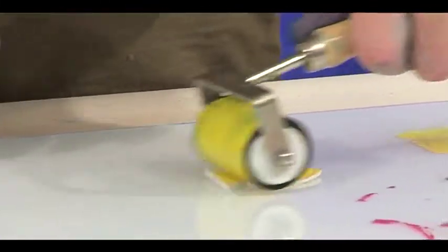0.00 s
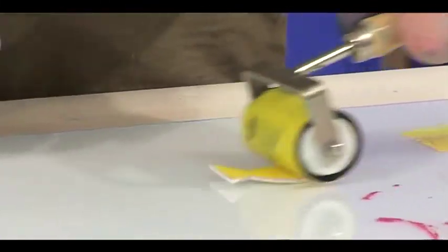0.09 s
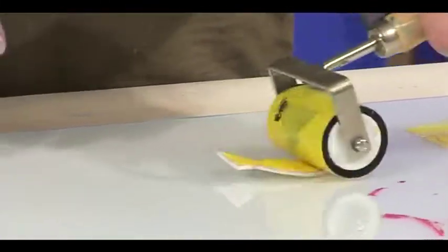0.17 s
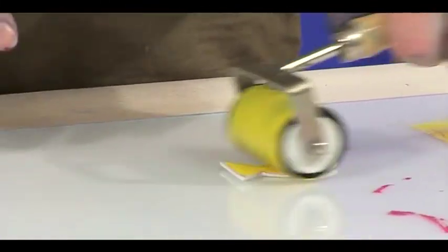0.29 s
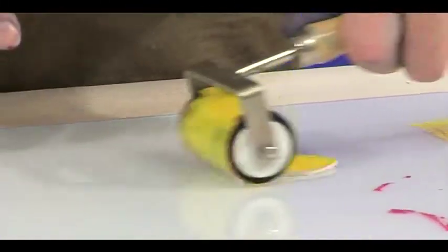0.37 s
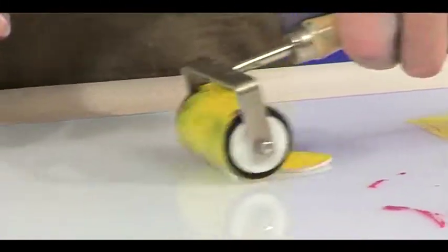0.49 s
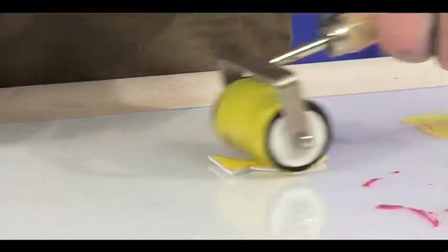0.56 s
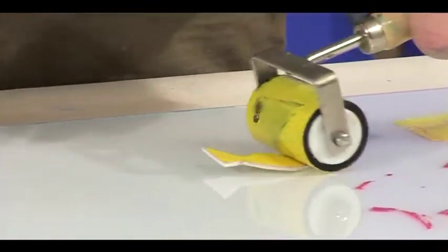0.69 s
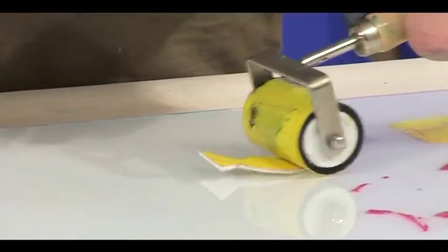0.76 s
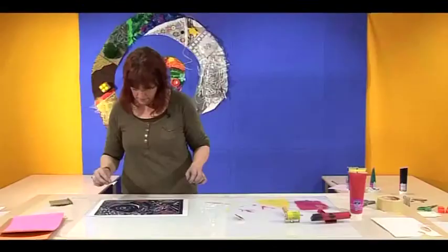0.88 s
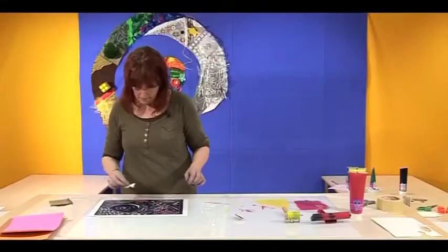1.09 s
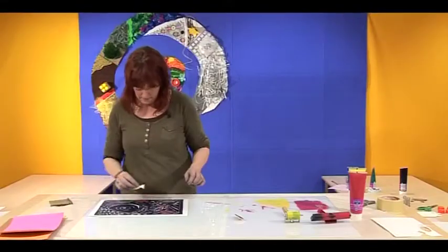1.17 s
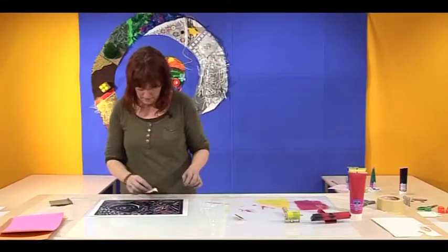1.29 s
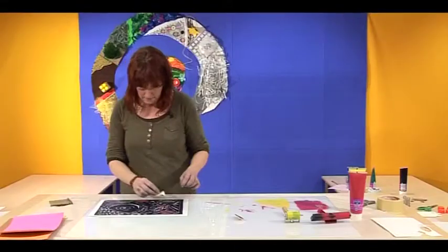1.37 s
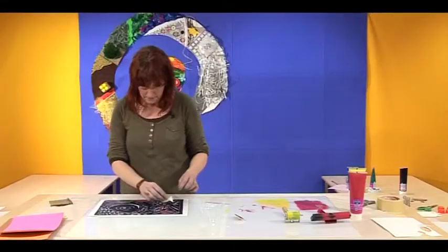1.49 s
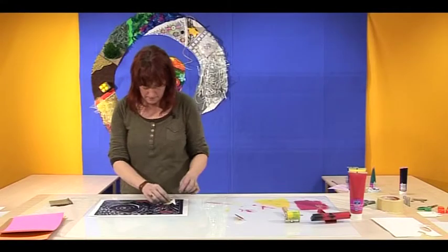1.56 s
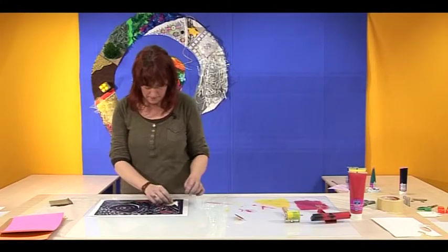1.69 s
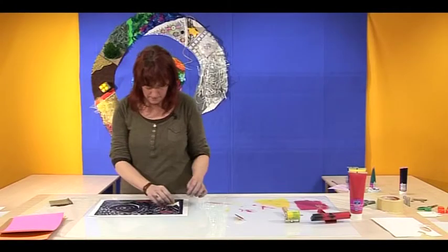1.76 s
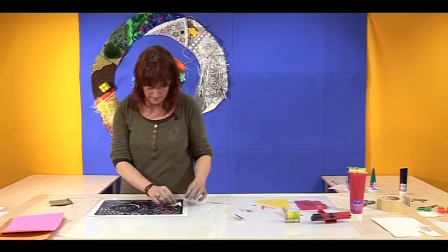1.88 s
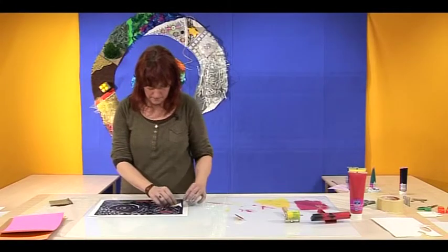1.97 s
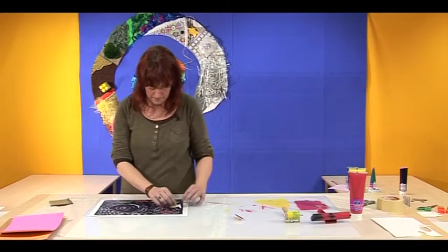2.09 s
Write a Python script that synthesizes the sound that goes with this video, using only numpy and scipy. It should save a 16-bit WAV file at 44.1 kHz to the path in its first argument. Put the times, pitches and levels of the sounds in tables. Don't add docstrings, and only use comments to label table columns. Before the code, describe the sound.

Close-up in a bare, echoing studio, a hand roller chirps and squeaks over faint tacky hiss, with a soft thud between strokes; halfway the sound cuts to a quiet ventilation rumble and light handling noises.

```python
import sys
import numpy as np
from scipy import signal
from scipy.fft import rfft, irfft
from scipy.io import wavfile
from scipy.ndimage import uniform_filter1d

SR = 44100
rng = np.random.default_rng(int(sys.argv[2]) if len(sys.argv) > 2 else 0)


def gain_from_db(level_db):
    decades = np.asarray(level_db, float) / 20
    return 10 ** decades


def wrap_up_sound(samples):
    columns = np.atleast_2d(samples).T
    tamed = np.clip(columns, -1, 1)
    steps = np.round(tamed * 32767).astype(np.int16)
    wavfile.write(sys.argv[1], SR, steps)


N = 92610
LEAD_S = 0.25
CUT_S, GAP_S = 0.9657, 0.004

# time in seconds, slip rate in Hz, level of the lowest tone in dB.
SQUEAK_PATHS = [
    [(-.2, 1946, -63), (-.18, 1965, -46.5), (-.13, 1993, -43.5), (-.11, 2030, -66)],
    [(.209, 1992, -69), (.213, 1962, -37.5), (.219, 1863, -39.5), (.23, 1817, -38.5), (.252, 1863, -39),
     (.256, 1731, -49), (.263, 1824, -47.5), (.271, 1968, -43), (.286, 2000, -53.5)],
    [(.699, 1900, -57), (.703, 1910, -53.5), (.711, 1894, -48), (.715, 1885, -113)],
    [(.768, 1764, -60), (.773, 1858, -39), (.78, 1899, -39), (.785, 1828, -41), (.789, 1660, -69)],
    [(.805, 1842, -77), (.813, 1846, -47), (.82, 1995, -42.5), (.825, 1902, -41), (.832, 2040, -42.5),
     (.842, 1995, -48.5), (.856, 1990, -77)],
]
SQUEAK_PRESS = [0, 1, 0, .35, 0]
OVERTONE_LEVELS = [
    [0, -6, -17, -26, -35, -38, -42, -48],
    [0, -1.5, -7, -15, -26, -22, -25, -29],
]
# time in seconds, half length in seconds, roughness 0 to 1.
STUMBLE_TIMES = [(.257, .008, .5), (.787, .004, .5)]
# pitch in Hz, width in Hz, level in dB.
BRACKET_RINGS = [(2560, 200, 8), (13090, 28, 20), (14980, 100, 13)]
# start, peak and end in seconds, pitch in Hz, peak level in dB.
FRAME_WHISTLES = [(.07, .13, .19, 2030, -69), (.192, .212, .217, 2200, -45), (.688, .702, .707, 1980, -52),
                  (.718, .727, .742, 2000, -60), (.73, .747, .756, 2060, -62), (.754, .77, .774, 2090, -54)]
# time in seconds, level in dB.
ROLLING_LEVEL = [(0, -73), (.03, -73.5), (.07, -77.5), (0.149, -66.5), (0.201, -68), (.3, -66),
                 (.36, -69.5), (0.439, -68), (.5, -71.5), (0.571, -86), (0.628, -72.5), (0.648, -63.5),
                 (.7, -68), (0.762, -71), (.88, -75), (.96, -78)]
# pitch in Hz, width in Hz, level in dB.
FRAME_RESONANCES = [(2020, 100, 4.5), (2550, 120, -0.5), (3540, 280, 4.5), (4780, 1600, 3.5),
                    (6500, 1900, -1), (11600, 5500, 0.5)]
# start in seconds, length in seconds, centre in Hz, width in Hz, level in dB.
BUMPS_AND_RUSTLES = [(.0, 0.028, 467, 563, -67.5), (.01, 0.12, 393, 120, -68),
                     (0.382, 0.065, 420, 146, -62), (0.378, 0.16, 520, 514, -90),
                     (0.399, 0.023, 167, 59.6, -64.5), (0.415, 0.1, 528, 192, -61.5),
                     (0.937, 0.063, 540, 204, -67.5), (0.949, 0.027, 915, 930, -66.5),
                     (0.994, 0.037, 3960, 4320, -71), (1.013, 0.022, 11350, 8000, -75),
                     (1.463, 0.012, 5800, 3000, -71.5), (1.46, 0.086, 4360, 2460, -72.5),
                     (1.467, 0.16, 1990, 2000, -73), (1.926, 0.0078, 3500, 3000, -75),
                     (1.983, 0.045, 1710, 400, -69), (1.988, 0.08, 1800, 3000, -78),
                     (2.002, 0.095, 302, 77.6, -61)]
# pitch in Hz, level in dB per Hz.
AIR_COLOUR = [(12, -66), (20, -11.5), (54, -5), (148, -20), (298, -17.5), (404, -21), (1070, -25.5),
              (3450, -41), (15500, -42.5)]
# pitch in Hz, width in Hz, level in dB before and after the scene changes.
HUM_BANDS = [(53, 5.7, -70, -67), (182.6, 23.5, -65, -74.5), (120, 21.7, -67, -70.5),
             (300.5, 22, -78.5, -74)]


def band(hz, width, size=N):
    f = np.fft.rfftfreq(size, 1 / SR) + 1
    resonance = 1 / (1 + 1j * (f / hz - hz / f) * hz / width)
    y = irfft(rfft(rng.standard_normal(size)) * resonance, size)
    return y / y.std()


def walk(rate, size):
    k = max(int(SR / rate), 1)
    y = uniform_filter1d(uniform_filter1d(rng.standard_normal(size), k), k)
    return y / y.std()


def axle_grit(size):
    edges = signal.butter(3, [3000, 8200], "bandpass", fs=SR, output="sos")
    return signal.sosfilt(edges, rng.standard_normal(size) * gain_from_db(2.0 * walk(640, size)))


def squeaks(t):
    size = len(t)
    full_db, soften = -40, 0.4
    overtone_lag_s = 0.0018
    rough = 0.08 + sum(r * np.exp(-((t - s) / half) ** 2) for s, half, r in STUMBLE_TIMES)
    grit = axle_grit(size)
    grit_db = -22 + 40 * rough
    light_db, hard_db = np.array(OVERTONE_LEVELS)
    out = np.zeros(size)
    for rows, press in zip(SQUEAK_PATHS, SQUEAK_PRESS):
        s, row_hz, row_db = np.array(rows).T
        on = (t > s[0]) & (t < s[-1])
        hz = np.interp(t, s, row_hz)
        db = np.interp(t, s, row_db)
        late_db = np.interp(t - overtone_lag_s, s, row_db)
        slip_hz = hz * (1 + 0.09 * rough * walk(900, size))
        phase = 2 * np.pi * np.cumsum(slip_hz) / SR
        out += on * (press + 0.3) * grit * gain_from_db(db + grit_db)
        tones_db = light_db + press * (hard_db - light_db)
        for k, tone_db in enumerate(tones_db):
            lose_db = np.sqrt(k) * soften * (late_db - full_db)
            wobble_db = 1.9 * np.sqrt(k + 0.1) * walk(250, size)
            level = np.sqrt(2) * gain_from_db(db + tone_db + lose_db + wobble_db)
            out += on * level * np.sin((k + 1) * phase + 2 * np.pi * rng.random())
    rung = 0
    for hz, width, db in BRACKET_RINGS:
        rung = rung + gain_from_db(db) * signal.lfilter(*signal.iirpeak(hz, hz / width, fs=SR), out)
    return out + rung


def whistles(t):
    rise_db = 24
    out = 0
    for start, peak, end, hz, db in FRAME_WHISTLES:
        level_db = np.interp(t, [start, peak, end], [db - rise_db, db, db - rise_db])
        phase = 2 * np.pi * np.cumsum(hz * (1 + 0.0108 * walk(193, len(t)))) / SR
        out = out + ((t > start) & (t < end)) * np.sqrt(2) * gain_from_db(level_db) * np.sin(phase)
    return out


def rolling(t):
    size = len(t)
    s, db = np.array(ROLLING_LEVEL).T
    hiss = 0
    for hz, width, band_db in FRAME_RESONANCES:
        hiss = hiss + gain_from_db(band_db + 2.0 * walk(27, size)) * band(hz, width, size)
    return hiss / hiss.std() * gain_from_db(np.interp(t, s, db) + 1.7 * walk(120, size))


def room(x):
    t = np.arange(int(1.5 * SR)) / SR
    gap_s, split_hz = 0.0079, 2800

    def fade(t60):
        return np.exp(-np.log(1000) * t / t60) * (t > gap_s) / np.sqrt(t60 * SR / np.log(1e6))

    def split(noise, kind):
        return signal.sosfilt(signal.butter(3, split_hz, kind, fs=SR, output="sos"), noise)

    low, high, early = rng.standard_normal((3, len(t)))
    echoes = gain_from_db(-13) * split(low, "low") * fade(1.14)
    echoes += gain_from_db(-20) * split(high, "high") * fade(1)
    echoes += gain_from_db(-11) * early * fade(0.13)
    return x + signal.fftconvolve(x, echoes)[:len(x)]


def handling(t):
    attack_s = 0.001
    out = 0
    for s, length, hz, width, db in BUMPS_AND_RUSTLES:
        age = np.clip(t - s, 0, 9)
        shape = np.minimum(age / attack_s, 1) * np.exp(-(age / length) ** 1.6)
        out = out + gain_from_db(db + 2 * walk(340, N)) * shape * band(hz, width)
    return out


def room_tone(t):
    f = np.fft.rfftfreq(N, 1 / SR) + 1
    hz, db = np.array(AIR_COLOUR).T
    colour = gain_from_db(np.interp(np.log(f), np.log(hz), db))
    air = irfft(rfft(rng.standard_normal(N)) * colour, N)
    out = air / air.std() * gain_from_db(-62.5 - 1 * (t < CUT_S))
    for hz, width, before_db, after_db in HUM_BANDS:
        hum_db = np.where(t < CUT_S, before_db, after_db)
        out = out + gain_from_db(hum_db + 1.1 * walk(15, N)) * band(hz, width)
    return out


def scene():
    t = np.arange(-int(LEAD_S * SR), N) / SR
    roller = room(squeaks(t) + whistles(t) + rolling(t))[-N:]
    t = t[-N:]
    mix = roller * (t < CUT_S) + handling(t) + room_tone(t)
    dip = np.where((t > CUT_S) & (t < CUT_S + GAP_S), gain_from_db(-24), 1)
    return (mix * dip)[None]


def roll_off(x):
    return signal.sosfilt(signal.butter(12, 15700, fs=SR, output="sos"), x)


def record(dry):
    low_pass = signal.ellip(8, 0.2, 70, 15500, fs=SR, output="sos")
    finished = signal.sosfilt(low_pass, dry)
    return roll_off(finished)


dry = scene()
out = record(dry)
wrap_up_sound(out)
```